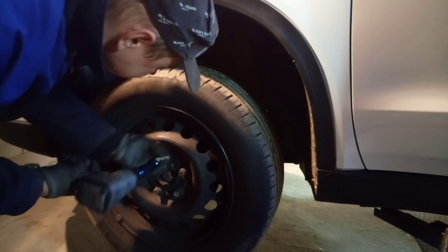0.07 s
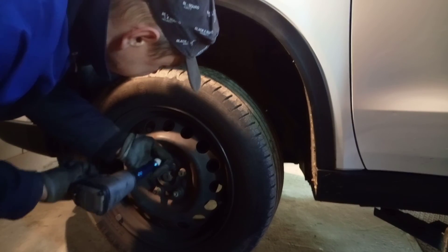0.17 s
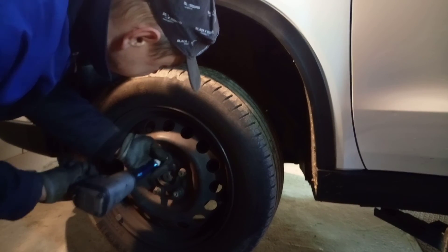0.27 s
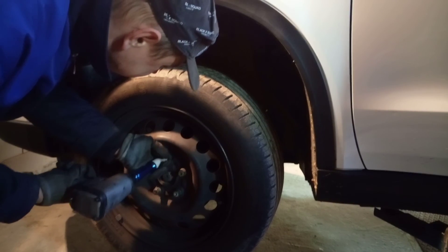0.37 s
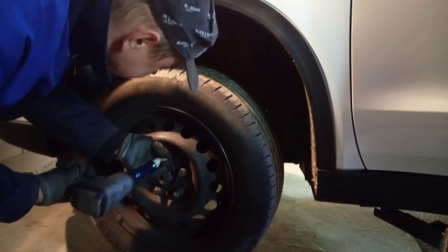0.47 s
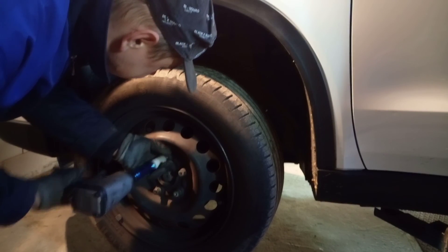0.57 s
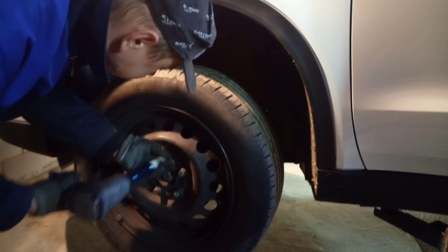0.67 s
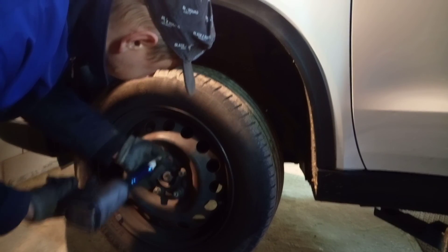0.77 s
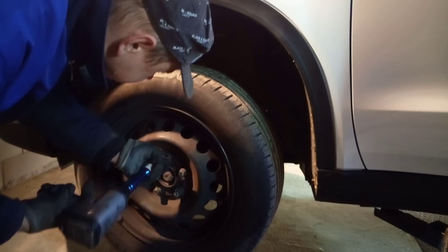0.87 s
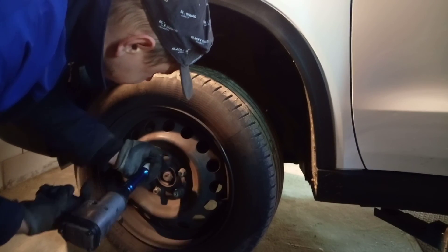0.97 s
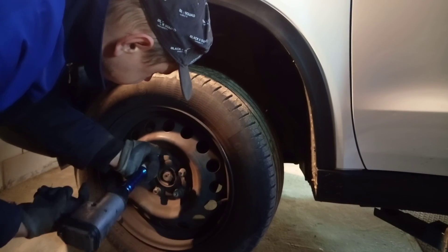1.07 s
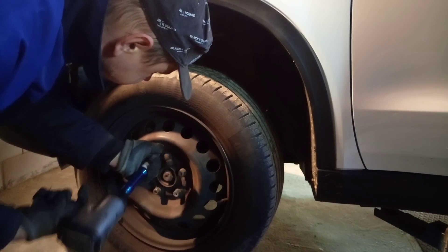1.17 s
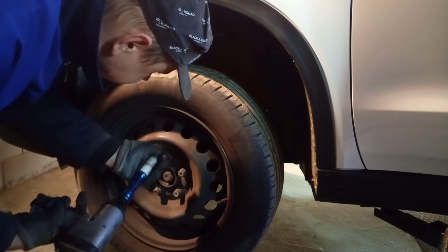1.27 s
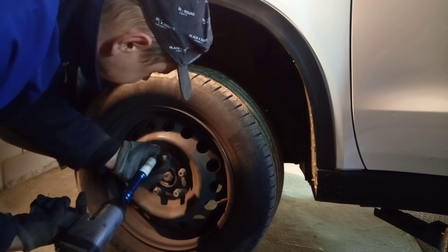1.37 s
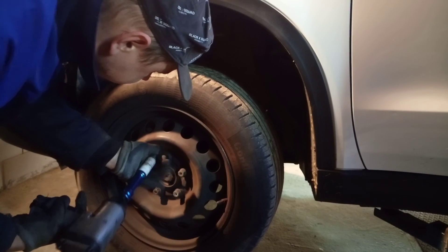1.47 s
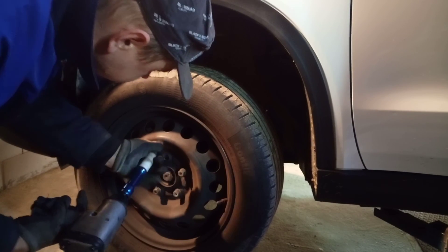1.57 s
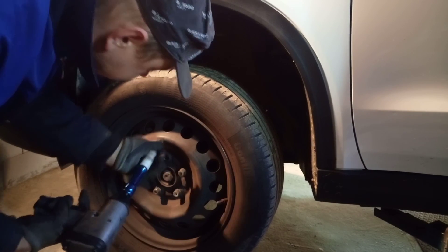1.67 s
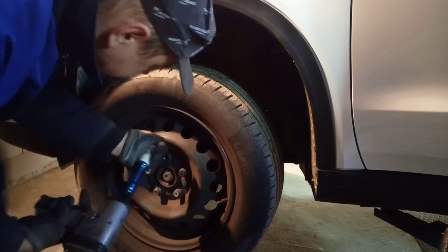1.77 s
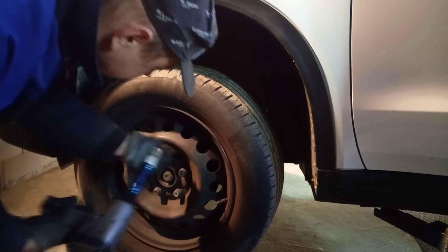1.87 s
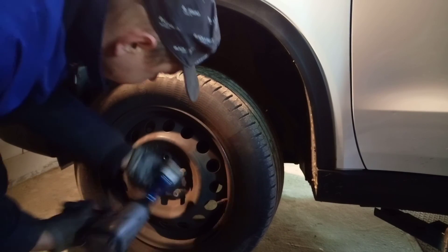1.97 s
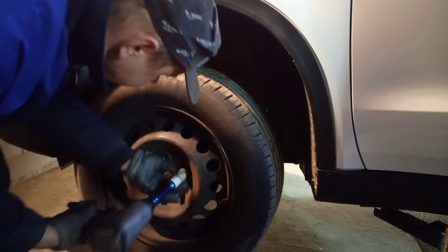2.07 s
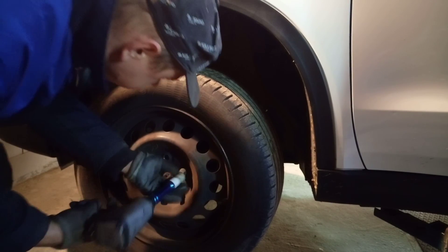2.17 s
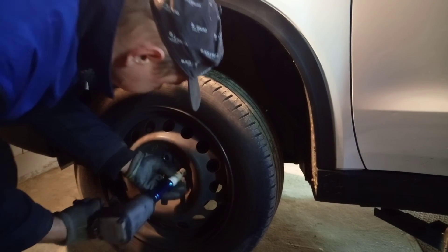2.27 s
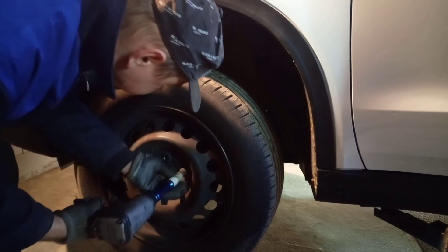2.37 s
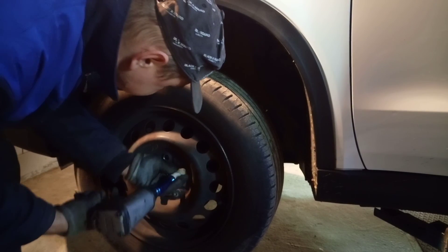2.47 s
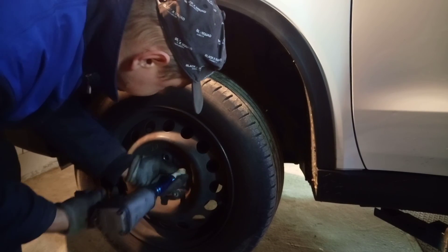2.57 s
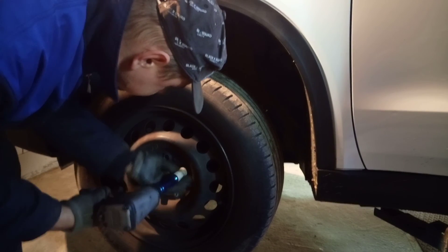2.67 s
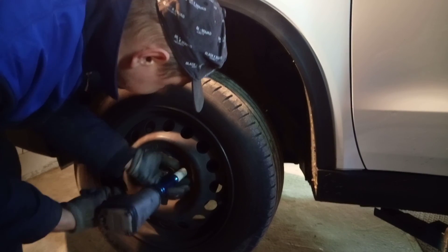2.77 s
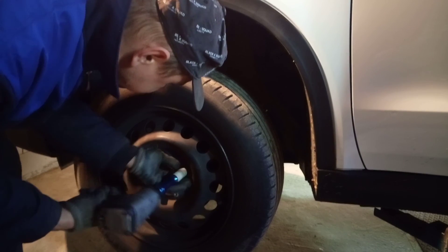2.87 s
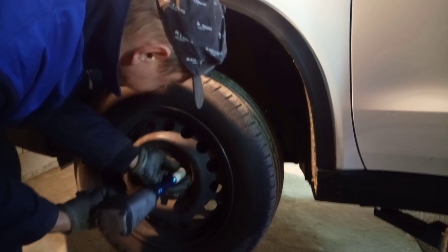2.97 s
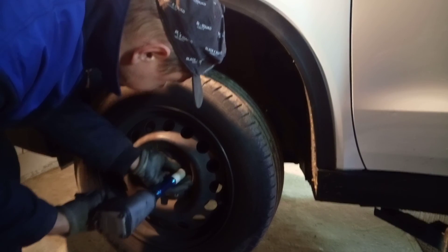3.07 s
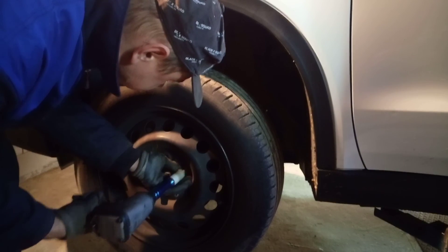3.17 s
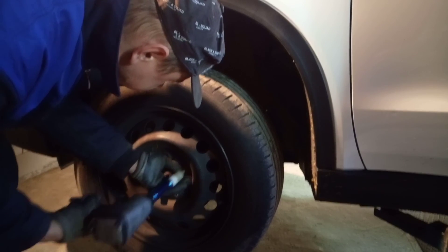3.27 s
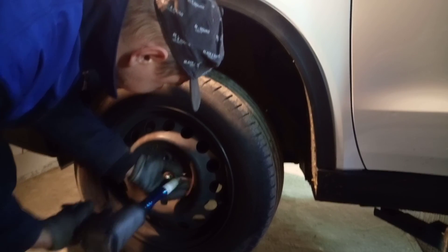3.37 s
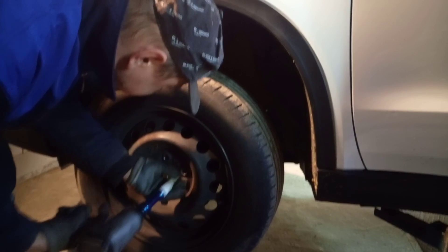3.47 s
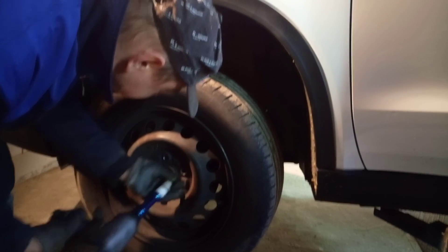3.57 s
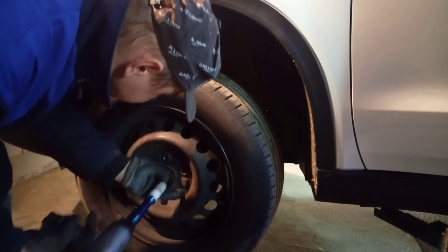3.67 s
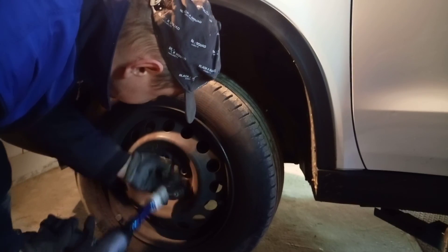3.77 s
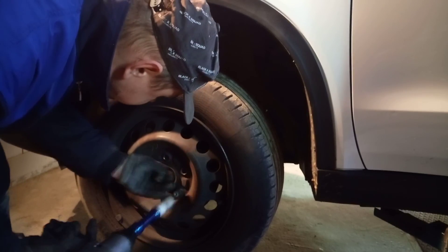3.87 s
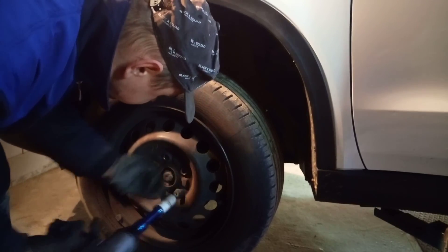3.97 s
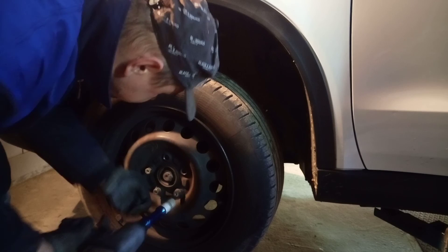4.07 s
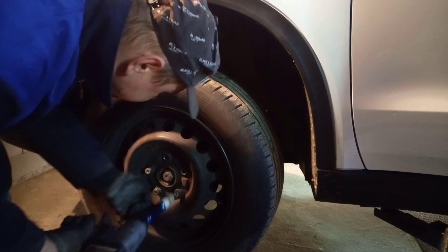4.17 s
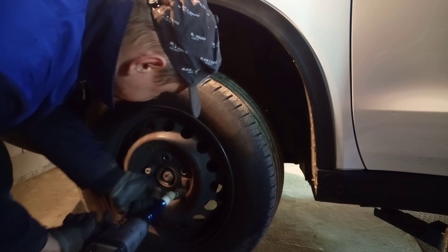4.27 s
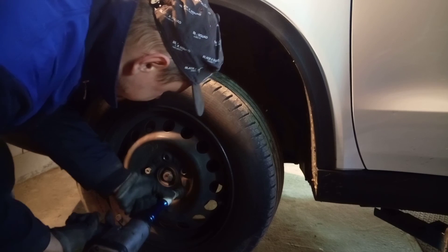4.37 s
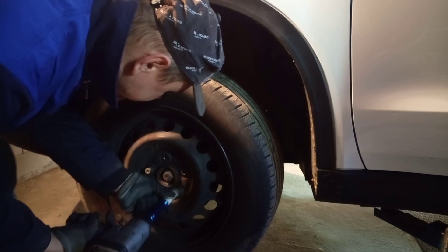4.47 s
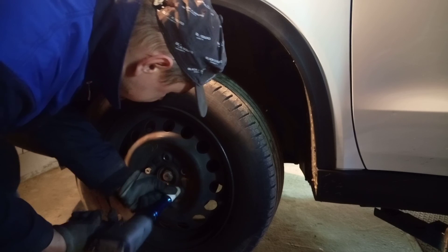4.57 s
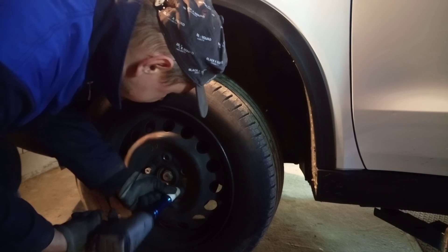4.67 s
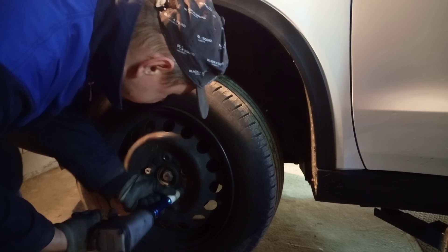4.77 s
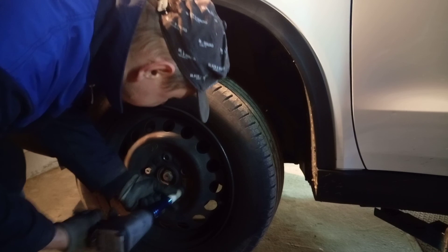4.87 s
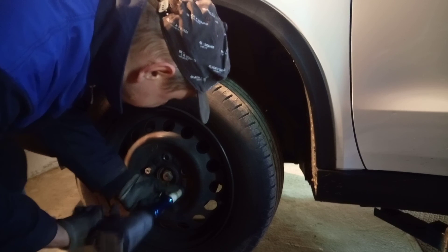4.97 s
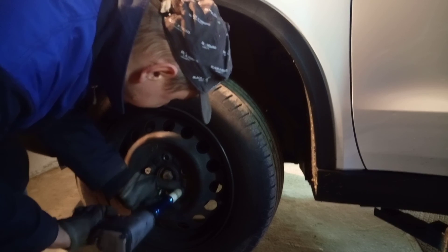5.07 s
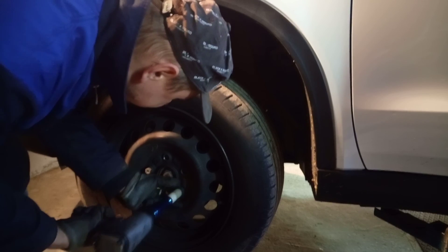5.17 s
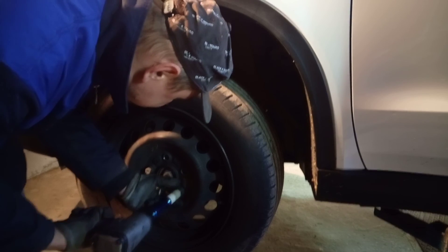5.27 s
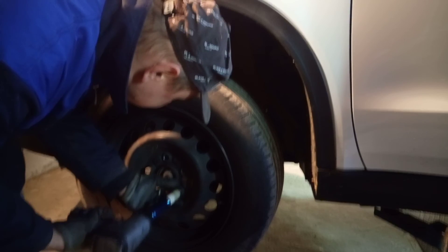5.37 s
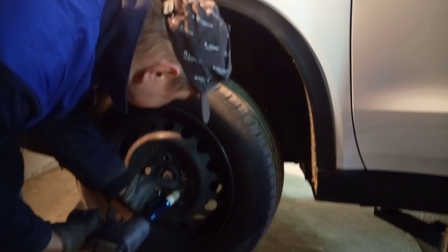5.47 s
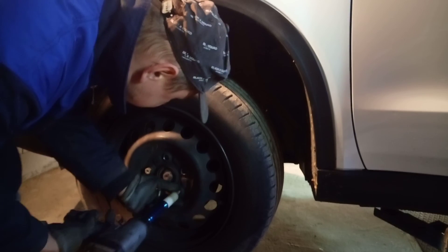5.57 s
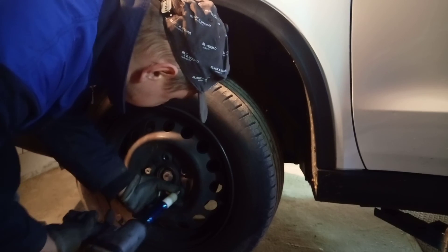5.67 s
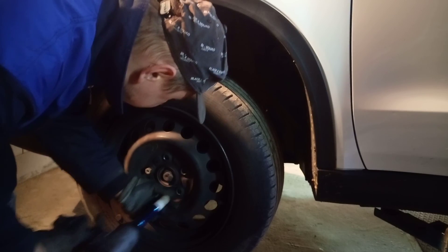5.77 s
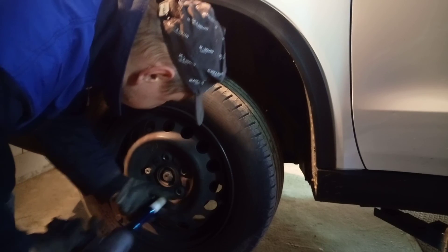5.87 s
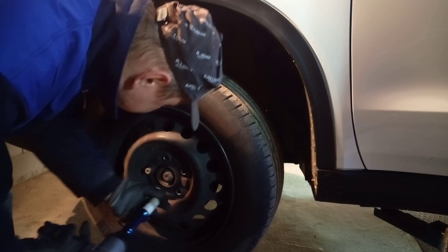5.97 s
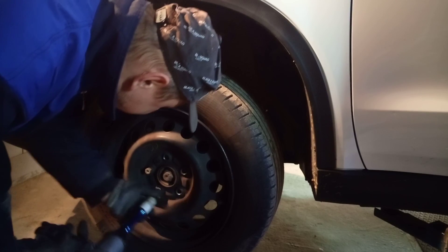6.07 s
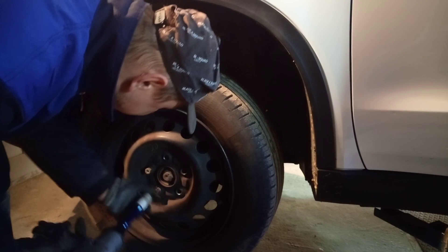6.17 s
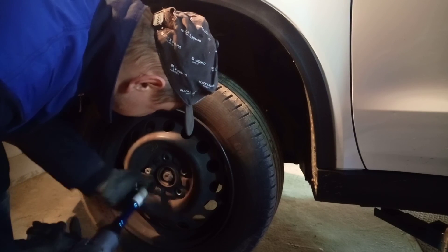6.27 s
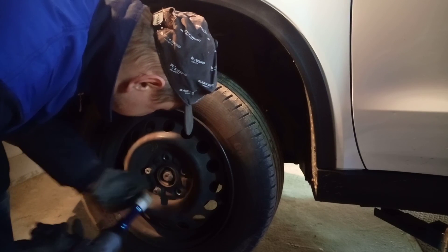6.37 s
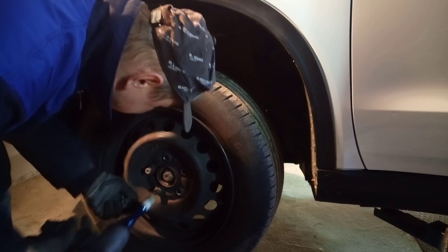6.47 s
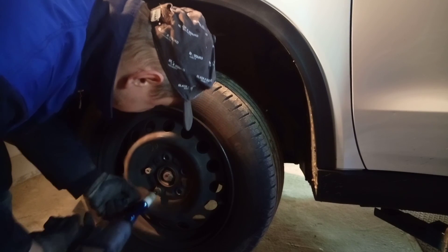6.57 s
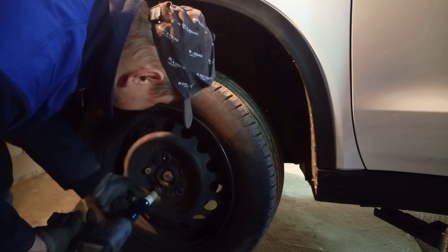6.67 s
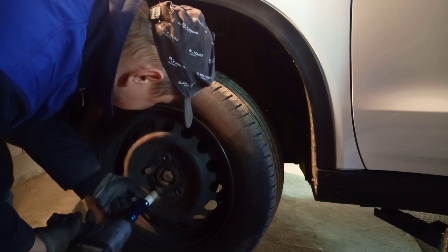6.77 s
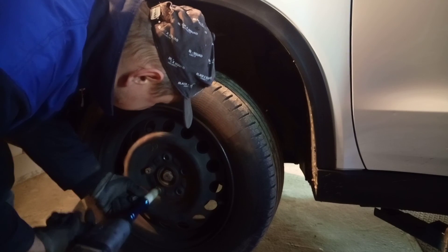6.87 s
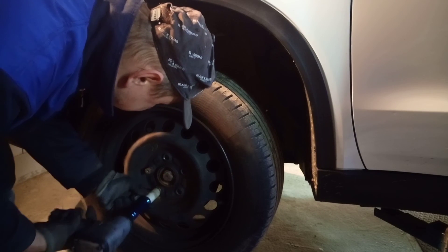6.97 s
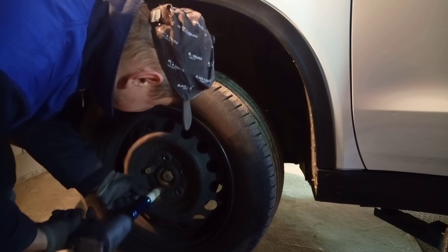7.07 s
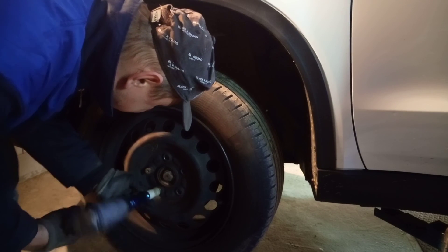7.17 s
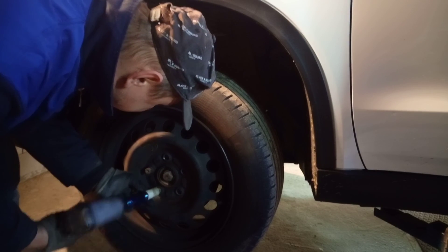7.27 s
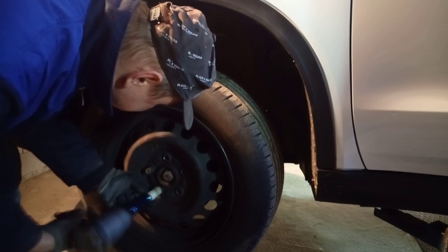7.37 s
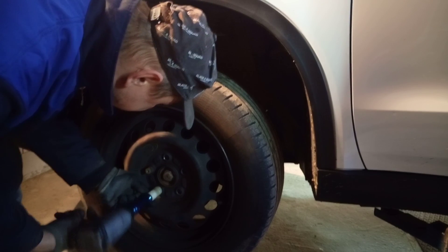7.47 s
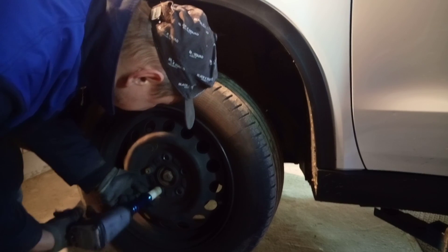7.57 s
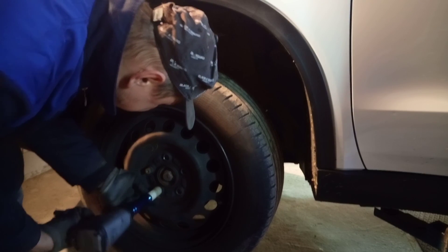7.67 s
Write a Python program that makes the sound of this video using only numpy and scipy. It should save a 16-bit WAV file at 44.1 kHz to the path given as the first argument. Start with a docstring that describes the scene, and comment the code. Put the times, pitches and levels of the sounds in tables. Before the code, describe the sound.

Four bursts of a cordless wrench on a steel wheel, heard from very near. Each whirrs upward with dense metallic rattle and sharp blows, then brakes in a falling groan. Between them come small nut clicks, cloth rubs, dull tyre thuds, hollow housing knocks and bright socket clanks that briefly ring the wheel. Short garage reflections follow, over a quiet unsteady hum and airy background.

```python
"""A cordless impact wrench spins lug nuts off a steel car wheel, close by in a garage.
The motor winds up and brakes as a stack of tones tied to shaft speed, with gear noise and socket rattle.
Hammer blows and socket clanks are bursts of steel chatter over decaying wheel modes.
Between the runs gloved hands click loose nuts and rustle, the socket scrapes once, the tool bumps the wheel.
A wavering low hum and a soft airy wash, both filtered noise, lie underneath."""
import sys
import numpy as np
from scipy import signal
from scipy.fft import rfft, irfft
from scipy.io import wavfile
from scipy.ndimage import uniform_filter1d

SR = 44100
rng = np.random.default_rng(int(sys.argv[2]) if len(sys.argv) > 2 else 0)


def file_out(sig):
    """Save sig as 16-bit WAV at sys.argv[1]."""
    # one column per channel
    cols = np.atleast_2d(sig).T
    # limit, then scale
    lim = np.clip(cols, -1, 1)
    pcm = np.round(lim * 32767).astype(np.int16)
    wavfile.write(sys.argv[1], SR, pcm)


N = 340893
TIME = np.arange(N) / SR
# Table levels are the mix before each function's own trims; spectrum levels are relative.


def amp(db):
    """Turns decibels into gain."""
    return 10 ** (np.asarray(db) / 20)


def unit(x):
    """Scales to rms 1."""
    return x / np.sqrt(np.mean(x ** 2) + 1e-20)


def read(points, hz):
    """Reads a spectrum on a log-frequency axis."""
    f, value = np.transpose(points)
    return np.interp(np.log(hz + 1), np.log(f + 1), value)


def add(mix, s, sound):
    """Mixes a sound in at time s; it may have begun before time zero."""
    start = round(s * SR)
    sound = sound[max(-start, 0):]
    part = mix[max(start, 0):][:len(sound)]
    part += sound[:len(part)]


def colour(x, spectrum, size=4096):
    """Filters causally to the given spectrum, falling 20 dB per octave past its ends."""
    hz = abs(np.fft.fftfreq(size, 1 / SR)) + 1
    octaves_out = abs(np.log2(hz / np.clip(hz, spectrum[0][0], spectrum[-1][0])))
    log_gain = np.log(amp(np.maximum(read(spectrum, hz) - 20 * octaves_out, -100)))
    # minimum phase: the energy comes as early as the spectrum allows
    response = np.fft.ifft(np.exp(np.conj(signal.hilbert(log_gain)))).real
    return signal.oaconvolve(x, response[:size // 2])[:len(x)]


def drift(length, hz):
    """Makes slow random movement around rms 1, with changes up to about the given rate."""
    f = np.fft.rfftfreq(length + SR, 1 / SR)
    noise = rfft(rng.standard_normal(length + SR))
    return unit(irfft(noise * np.exp(-(f / hz) ** 2)))[:length]


def grains(length, per_s, spread_db):
    """Scatters random contacts of uneven size and either sign."""
    size = amp(spread_db * np.minimum(rng.exponential(1, length), 4))
    sign = rng.choice([-1., 1.], length)
    return unit(size * sign * (rng.random(length) < per_s / SR))


def fade(length, size=300):
    """Ramps both ends briefly."""
    return signal.windows.tukey(length, 2 * size / length)


def resonate(x, hz, width):
    """Passes a sound through one damped resonance; width [Hz] sets the damping."""
    r = np.exp(-np.pi * width / SR)
    return signal.lfilter([1 - r, 0, r - 1], [1, -2 * r * np.cos(2 * np.pi * hz / SR), r * r], x)


def patchy(x, depth_db, size=1024):
    """Lets narrow parts of a noise swell and fade on their own."""
    z = signal.stft(x, nperseg=size)[2]
    patches = uniform_filter1d(rng.standard_normal(z.shape), size=4, axis=0)
    patches = unit(uniform_filter1d(patches, size=7, axis=1))
    return unit(signal.istft(z * amp(depth_db * patches), nperseg=size)[1][:len(x)])


# room bed over time: (time [s], low hum level [dB], airy wash level [dB])
BACKGROUND = [(1.15, -62.5, -65.5), (2.0, -59.5, -60.5), (3.6, -51, -57.5), (4.4, -50, -51),
              (5.901, -55.5, -55), (6.35, -56.5, -62), (7.15, -51.5, -53)]
# low hum spectrum: (frequency [Hz], level per Hz [dB])
HUM = [(20, -19), (45, -9.5), (65, 2), (90, -5.5), (115, 6), (150, -11), (220, -14.5), (400, -22),
       (900, -43.5)]
# airy wash spectrum: (frequency [Hz], level per Hz [dB])
WASH = [(150, -6.5), (380, -22.5), (560, 2.5), (760, -1.5), (920, 4), (1020, 9.5), (1140, 0.5),
        (1500, -4.5), (2500, -22.5), (4700, -5.5), (6500, -18), (8000, -36), (16000, -39.5)]


def background(hum_db=0, wash_db=-2.0, waver_db=2.3):
    """Filtered noise makes a wavering low hum and a soft wash of air with a faint whistle in it."""
    s, hum_level, wash_level = np.transpose(BACKGROUND)
    hum = unit(colour(rng.standard_normal(N), HUM))
    hum *= amp(hum_db + np.interp(TIME, s, hum_level) + waver_db * drift(N, 6))
    wash = patchy(colour(rng.standard_normal(N), WASH), depth_db=2.8)
    return hum + wash * amp(wash_db + np.interp(TIME, s, wash_level))


# how long the garage rings on: (frequency [Hz], decay by 60 dB [s])
GARAGE = [(100, 0.58), (400, 0.56), (1500, 0.49), (5000, 0.37), (8000, 0.13), (15000, 0.21)]


def garage(x, size=16):
    """Sparse reflections of random sign, each band dying at its own speed."""
    taps = np.zeros(SR)
    at = np.arange(SR // 200, SR - size, size)  # the reflections begin about 5 ms in
    taps[at + rng.integers(0, size, len(at))] = rng.choice([-1., 1.], len(at))
    hz, t, z = signal.stft(taps, SR, nperseg=256)
    decay = amp(-60 * t / read(GARAGE, hz)[:, None])
    tail = signal.istft(z * decay, SR, nperseg=256)[1]
    return signal.oaconvolve(x, tail / np.linalg.norm(tail))[:N]


# spectrum of the rustle and scrape: (frequency [Hz], level per Hz [dB])
CLOTH = [(150, -27), (400, 1), (1000, -2), (2500, 1.5), (3600, 1), (4700, 4), (6000, 2), (7300, -22),
         (10000, -30), (13800, -29), (15200, -8), (16200, -29)]
# gloves and sleeves rubbing; the short last row is the socket scraping before it lands:
# (start [s], length [s], level [dB])
RUBS = [(1.024, 0.25, -62), (1.281, 0.16, -53), (1.42, 0.32, -52.5), (1.628, .22, -52.5),
        (1.82, 0.26, -57.5), (2.212, 0.16, -59), (3.42, 0.3, -49.5), (3.9, 0.22, -56), (4.27, 0.22, -52),
        (5.619, 0.25, -48.5), (5.798, 1, -57.5), (6.86, 0.28, -59.5), (7.177, 0.062, -48)]
# faint rubbing squeaks: (start [s], length [s], middle pitch [Hz], level [dB])
SQUEAKS = [(1.325, .125, 700, -48), (1.44, .06, 715, -57), (1.53, .07, 760, -60)]


def handling(level_db=-1, rough_db=4, glide=0.048):
    """Grainy noise in short swells for cloth rubs and one socket scrape; squeaks are tones gliding up."""
    out = np.zeros(N)
    grip = amp(4.5 * np.tanh(drift(N, 30)))
    rustle = patchy(colour(grains(N, 1500, 4.0) * grip, CLOTH), depth_db=2.5, size=512)
    for s, length_s, db in RUBS:
        add(out, s, amp(db + level_db) * signal.windows.tukey(round(length_s * SR), .6))
    out *= rustle
    for s, length_s, hz, db in SQUEAKS:
        u = np.linspace(0, 1, round(length_s * SR))
        turns = np.cumsum(hz * (1 + glide * (u - .5) + 0.064 * drift(len(u), 120))) / SR
        level = amp(db + rough_db * drift(len(u), 85)) * np.sin(np.pi * u ** 1.7)
        add(out, s, level * np.sin(2 * np.pi * turns))
    return out


# the tool bumping wheel and tyre: (time [s], tyre thud level [dB], housing knock level [dB])
BUMPS = [(1.667, -54, -40.5), (2.072, -42.5, -37.5), (2.295, -46.5, -33.5), (4.107, -43, -37.5),
         (4.569, -52, -35), (4.752, -33.5, -26.5), (6.511, -44.5, -41.5), (6.767, -52, -36.5),
         (7.245, -39, -26.5)]


def bumps(tyre_db=2, housing_db=0, tyre_s=0.091, housing_s=.035, size=14000):
    """The tool bumps the wheel: a low thud from the tyre and a hollow knock from the housing."""
    out, t = np.zeros(N), TIME[:size]
    # both spectra: (frequency [Hz], level per Hz [dB])
    thud = [(45, -7.0), (80, 2), (125, 3.0), (190, -3.5), (300, -28.5)]
    knock = [(180, -13.5), (300, -11.5), (380, -12), (470, -10.5), (620, -18.5), (900, -18.5)]
    for s, tyre, housing in BUMPS:
        parts = (tyre + tyre_db, thud, tyre_s), (housing + housing_db, knock, housing_s)
        for db, spectrum, decay_s in parts:
            noise = unit(colour(rng.standard_normal(size), spectrum))
            envelope = (1 - np.exp(-t / 0.0043)) * np.exp(-t / decay_s)
            add(out, s, amp(db) * noise * envelope)
    return out


LEAD_S = .001  # each contact begins this long before its listed time
# the three registers of a steel contact, each: (frequency [Hz], level per Hz [dB])
BRIGHT = [(1500, -32), (2400, 0), (3300, -0.5), (4600, 1), (5600, 0.5), (6500, -1.5), (7300, -12.5),
          (9000, -39)]
BODY = [(120, -44.5), (330, -3), (480, -2), (700, -3.5), (1050, 1), (1400, 1), (1900, 5.5), (2400, -1),
        (3400, -27)]
SIZZLE = [(6000, -20), (7800, 4), (9500, 1.5), (11700, -3.5), (13600, -4), (14700, 4), (15500, 6.5),
          (16200, -17)]


def contact(hz, levels_db, decay_s, tail_db, tail_s, focus=2.0, crack=2.0, size=6000):
    """Steel on steel: one crack in chatter that dies fast over a fainter, longer tail, strongest near hz."""
    t = TIME[:size]
    onset = 1 - np.exp(-t / .001)
    envelope = onset * (np.exp(-t / decay_s) + amp(tail_db) * np.exp(-t / tail_s))
    first = crack * signal.unit_impulse(size, SR // 700)
    bands = []
    for spectrum in (BRIGHT, BODY, SIZZLE):
        chattering = envelope * grains(size, 9000, spread_db=2.2)
        bands.append(colour(first + chattering, spectrum))
    bands[0] = bands[0] + focus * resonate(bands[0], hz, 560)
    # levels refer to the first 20 ms
    return sum(amp(db) * band / np.std(band[:SR // 50]) for db, band in zip(levels_db, bands))


# loose nuts clicking in hand and socket:
# (time [s], strength [dB], brightest frequency [Hz], sizzle relative to strength [dB])
CLICKS = [(0.998, -37.5, 4500, -24.5), (1.016, -35.5, 3370, -32), (1.038, -36.5, 4800, -21),
          (1.122, -40.5, 3400, -34), (1.5334, -34.5, 3870, -21), (1.635, -28.5, 3480, -12.5),
          (1.83, -35, 3170, -13), (1.8914, -44, 4140, -27), (2.4137, -32.5, 5100, -26),
          (3.43, -36, 3914, -22), (3.455, -31, 4240, -15), (3.47, -29, 4650, -20),
          (3.6057, -31.5, 4870, -12), (3.9955, -25, 5550, -18.5), (4.1024, -28, 4600, -12),
          (4.1136, -32.5, 5200, -11), (4.3446, -41.5, 5200, -18), (4.3962, -36.5, 4960, -42),
          (5.7018, -26.5, 4480, -20.5), (6.142, -33.5, 4830, -17.5), (6.316, -36.5, 4760, -39),
          (6.427, -36, 2800, -35), (6.4989, -26, 2700, -16), (6.5113, -26, 4850, -11.5)]


def clicks(bright_db=-7, body_db=-17, sizzle_db=-7.5):
    """Loose nuts click, damped by the glove, so no wheel ring follows."""
    out = np.zeros(N)
    for s, db, hz, sizzle in CLICKS:
        levels = db + bright_db, db + body_db, db + sizzle + sizzle_db
        sound = contact(hz, levels, decay_s=0.007, tail_db=-25, tail_s=.024, focus=1.1)
        add(out, s - LEAD_S, sound)
    return out


LOWER_NUTS_FROM_S = 4.0
# ringing modes of socket on wheel:
# (frequency [Hz], decay by 60 dB [s], level on an upper nut [dB], level on a lower nut [dB])
STEEL = [(474, .35, -13, -14), (1003, .36, -13, -11), (1055, .35, -6, -17), (1450, .25, -12, -10),
         (1622, .3, -12, -12), (1750, .32, -11, -11), (1843, .36, 0, -8), (1911, .32, -7, -4),
         (2170, .25, -10, -9), (2743, .36, -14, -1), (2765, .22, -16, -11), (3095, .38, -14, -4),
         (3521, .35, -9, -13), (4290, .27, -10, -18), (4466, .3, -13, -17), (4692, .3, -9, -15),
         (5136, .26, 0, -8), (5205, .3, -4, 0), (5274, .3, -3, 2), (5335, .25, -4, 1), (5440, .18, -4, -4),
         (5800, .2, -6, -5), (6280, .22, -11, -13)]


def ring(s, strongest_hz, favour_db=6.0, uneven_db=-1.0):
    """One blow's ring: the mode balance depends on the nut and on just where the socket lands."""
    t = TIME[:SR // 2]
    hz, t60, upper_db, lower_db = np.transpose(STEEL)[:, :, None]
    luck, bend, phase = rng.standard_normal((3, len(STEEL), 1))
    favoured = np.exp(-(np.log(hz / strongest_hz) / .05) ** 2)
    nut_db = lower_db if s >= LOWER_NUTS_FROM_S else upper_db
    db = nut_db + favour_db * favoured + uneven_db * luck
    tones = np.sin(2 * np.pi * (hz * (1 + .001 * bend) * t + phase))
    modes = amp(db - 60 * t / t60) * tones
    return modes.sum(0) * (1 - np.exp(-t / .002)) / 2


# socket meeting nut and wheel: (time [s], strength [dB], brightest frequency [Hz], body [dB],
# sizzle [dB], ring [dB], strongest ring [Hz]); body, sizzle and ring are relative to strength
CLANKS = [(2.0716, -23, 2620, -2.5, -19, -45, 1843), (2.0784, -22, 5160, -14, -9, -47, 1843),
          (2.29, -17.5, 4670, -12, -13.5, -24, 5136), (2.304, -15, 5130, -5, -22, -14.5, 1055),
          (2.4466, -24, 4840, -5, -13, -32, 5136), (2.4538, -18, 4700, -15, -12, -17, 5136),
          (2.4727, -17, 5400, -1.5, -31, -12, 1911), (4.4735, -49, 2870, 19.5, -39, -2, 1622),
          (4.577, -14.5, 5500, -3, -26, -13.5, 1911), (4.6454, -23, 5660, 3, -30, -22, 1622),
          (4.704, -27.5, 4500, -5.5, -26, -33, 4692), (4.749, -12, 5380, -7, -18, -12.5, 2743),
          (6.76, -25, 4970, 2.5, -29, -14.5, 1770), (6.778, -24.5, 5150, 0.5, -34, -23, 3095),
          (6.851, -38, 5300, -2, -45, -21, 5274), (6.976, -50, 2880, 18, -26, -2, 1622),
          (7.0368, -37, 4740, -7, -39, -18, 4692), (7.2001, -19, 4900, -3.5, -30, -36, 1750),
          (7.2423, -11, 5400, -8, -20, -16, 3095)]


def clanks(bright_db=-8.5, body_db=-7.5, sizzle_db=-8.0, ring_db=3.0):
    """The socket lands on a nut and sets the wheel ringing."""
    out = np.zeros(N)
    for s, db, hz, body, sizzle, ringing, ring_hz in CLANKS:
        levels = db + bright_db, db + body + body_db, db + sizzle + sizzle_db
        add(out, s - LEAD_S, contact(hz, levels, decay_s=.0077, tail_db=-13.5, tail_s=0.023))
        add(out, s, amp(db + ringing + ring_db) * ring(s, ring_hz))
    return out


# hammer blows and the hardest knocks of the spinning socket:
# (time [s], strength [dB], brightest frequency [Hz], body relative to strength [dB])
BLOWS = [(0.0113, -10, 4100, -5.5), (0.0799, -12, 4480, -14.5), (.242, -14.5, 6660, -17),
         (0.3287, -14.5, 4700, -21), (.349, -17.5, 4580, -28), (0.4979, -18, 4600, -25),
         (0.584, -19, 5060, -17), (.63, -21, 6100, -11.5), (0.705, -33, 3680, -5), (2.611, -17.5, 4890, 0),
         (2.6216, -15, 5310, -13.5), (2.639, -15, 5450, -14.5), (2.6738, -9, 2770, -5.5),
         (2.7235, -11.5, 3990, -1.5), (2.8629, -13.5, 4550, -8), (3.1427, -16.5, 5070, -8),
         (3.272, -17, 4570, -22.5), (3.3376, -22.5, 5080, -12.5), (4.9117, -13, 5270, -11.5),
         (4.9314, -11.5, 5700, -11), (4.9656, -9.5, 2740, -12), (5.0511, -10.5, 4400, -11),
         (5.1703, -13, 4770, -10.5), (5.434, -16, 5200, -22), (5.55, -18, 4800, -12),
         (5.6167, -29, 3045, -3), (7.4467, -14, 4735, -11), (7.4537, -14.5, 4750, -25),
         (7.4706, -15, 5340, -9), (7.506, -9, 5500, -7), (7.663, -12.5, 5440, -11.5)]
# top treble of a blow; below the first row's strength it stays faint, above it harder blows
# sizzle more: (strength [dB], sizzle level [dB])
BLOW_SIZZLE = [(-19, -60), (-26.5, -44), (-18, -34), (-5, -17)]


def blows(bright_db=-9.0, body_db=-9, sizzle_db=-9.0, ring_db=-20):
    """Short hard blows through the seated socket; the wheel rings only a little."""
    out = np.zeros(N)
    for s, db, hz, body in BLOWS:
        sizzle = np.interp(db, *np.transpose(BLOW_SIZZLE))
        levels = db + bright_db, db + body + body_db, sizzle + sizzle_db
        add(out, s - LEAD_S, contact(hz, levels, decay_s=.0048, tail_db=-18.5, tail_s=.018))
        add(out, s, amp(db + ring_db) * ring(s, hz))
    return out


# bare steel ticks of the rattle: (frequency [Hz], level per Hz [dB])
RATTLE = [(1060, -32), (1800, -14.5), (2300, -18.5), (2840, -0.5), (3170, -2), (3610, 3.5), (3840, -1),
          (4620, 0.5), (5800, -0.5), (6470, 2.5), (7990, -14), (9770, -18), (13400, -22.5), (14900, -14),
          (16000, -15)]
# short-lived resonances of spinning socket and anvil: (frequency [Hz], width [Hz], level [dB])
SOCKET = [(1825, 180, -12.5), (2090, 45, -7), (2740, 21, -19.5), (2920, 38, 0), (3400, 110, -8.5),
          (3800, 37, -8), (4190, 180, 0.5), (4640, 80, -1.5), (4600, 130, 2.5), (5090, 160, 0.5),
          (5530, 39, 0.5), (5910, 200, -1.5), (6260, 120, -1.5), (6510, 80, -4), (11650, 150, -14),
          (15000, 500, -3)]


def chatter(angle, throb=0.073, tick_db=-2, socket_db=-3, knocks_per_s=450, patchy_db=6.0):
    """Socket and nut collide, a little more at one point of each turn; the resonances waver separately."""
    length = len(angle)
    bunching = unit(np.exp(throb * np.cos(angle)))
    ticks = grains(length, 3000, 0.82) * bunching * amp(0.5 * drift(length, 90))
    ticks = patchy(colour(ticks, RATTLE), depth_db=3.5, size=512)
    knocks = np.zeros(length)
    for hz, width, db in SOCKET:
        hits = grains(length, knocks_per_s, 2.1) * bunching
        ringing = resonate(resonate(hits, hz, width), hz, 8 * width)
        knocks += amp(db + patchy_db * drift(length, 45)) * unit(ringing)
    return amp(tick_db) * ticks + amp(socket_db) * unit(knocks)


# shaft turns per second as the motor catches and running free; STOP_HZ sets how long braking lasts
START_HZ, TOP_HZ, STOP_HZ = 87.7, 365.5, 35.88
# motor orders: (multiple of shaft speed, level under power [dB], level while braking [dB])
ORDERS = [(1, 2.5, 7.5), (2, -3.5, 0), (3, -9.5, -5.5), (4, -15, -9.5), (5, -12.5, -19), (6, -13.5, -15.5),
          (8, -31.5, -19), (9, -9.5, -15.5)]
# how the housing radiates the orders: (frequency [Hz], gain [dB])
HOUSING = [(70, -15), (115, -6.5), (180, -3.5), (240, -11), (350, 3.5), (480, -6.5), (690, 2.5), (840, -5),
           (1020, 10), (1250, 6), (2000, 4), (3200, -10.5)]
# gear case noise: (frequency [Hz], level per Hz [dB])
GEARS = [(200, -38.5), (400, -4.5), (550, -6.5), (800, -2), (1020, -5), (1200, -3.5), (1600, -3.5),
         (2000, -1), (2600, 2), (3600, -39)]
# housing shudder as the motor labours and brakes: (frequency [Hz], level per Hz [dB])
SHUDDER = [(60, -40), (120, -13.5), (190, -7.5), (280, -10.5), (360, 2), (450, -8.5), (600, -16.5),
           (1000, -27.5)]


def wrench(hz, coast, rattle_level, motor_level, gear_level,
           rattle_db=5, motor_db=-4, gears_db=-4.0, shudder_db=-7,
           wobble=0.01294, flutter_db=3.0, surge_db=1.0, judder=2.2, blur_db=2.0):
    """Motor orders, gears and rattle follow the shaft speed hz; coast is the braking clock [s]."""
    length = len(hz)
    braking = np.clip(coast / 0.04, 0, 1)
    unsteady = wobble * (1 + judder * braking) * drift(length, 90)
    angle = 2 * np.pi * np.cumsum(hz * (1 + unsteady)) / SR
    gains, orders = [], []
    for k, on, off in ORDERS:
        gains.append(amp(on + (off - on) * braking + read(HOUSING, k * hz)))
        flutter = amp(flutter_db * drift(length, 72))
        orders.append(flutter * np.cos(k * angle + 2 * np.pi * rng.random()))
    gains = np.array(gains)
    # scaling by the summed gains keeps the stack's overall level even
    tone = np.sqrt(2) * (gains * np.array(orders)).sum(0) / np.linalg.norm(gains, axis=0)
    meshing = grains(length, 2500, 1.5) * np.exp(0.23 * np.cos(angle))
    gears = patchy(colour(meshing, GEARS), depth_db=3.0)
    # near top speed under power the clean orders take over from gear noise and shudder
    free = (hz / TOP_HZ) ** 4 * (1 - braking)
    shudder = unit(colour(grains(length, 900, 3.2), SHUDDER)) * amp(shudder_db - 26 * free)
    motor = motor_level * (amp(motor_db - blur_db * braking) * tone + shudder)
    low = motor + gear_level * amp(gears_db - 5 * free) * gears
    high = rattle_level * amp(rattle_db + surge_db * drift(length, 25)) * chatter(angle)
    return low * fade(length), high * fade(length)


# light touches of the trigger that seat the socket:
# (start [s], length [s], motor level [dB], rattle level [dB])
NUDGES = [(2.461, 0.086, -30, -41), (4.763, 0.17, -31, -39.5), (7.256, .18, -30, -38)]
KICK_HZ, KICK_S, CRAWL_HZ = 191.4, .028, 105.2  # the motor kicks, then settles to a crawl
NUDGE_FADE_DB_PER_S, SEATING_DB_PER_S = 32.5, 49  # rattle fades faster as the socket seats
NUDGE_GEARS_DB = 9  # gears above rattle, before the trims in wrench()


def nudge(length_s, motor_db, rattle_db):
    """The motor kicks and crawls, turning the socket over the nut while motor and rattle fade."""
    t = np.arange(0, length_s, 1 / SR)
    hz = CRAWL_HZ + (KICK_HZ - CRAWL_HZ) * np.exp(-t / KICK_S)
    motor = amp(motor_db - NUDGE_FADE_DB_PER_S * t)
    rattle = amp(rattle_db - SEATING_DB_PER_S * t)
    return wrench(hz, t, rattle, motor, rattle * amp(NUDGE_GEARS_DB))


# full trigger pulls, one per nut: (start [s], held [s], wind-up [s], braking [s],
# rattling on after release [s], rattle level [dB], motor level [dB], gear level [dB])
PULLS = [(-.025, 0.39, 0.21, 0.2, .2, -27, -23, -30.5), (2.6, 0.41, 0.24, .2, .24, -28.5, -23, -28.5),
         (4.905, .325, .22, .225, 0.26, -29, -22.5, -31), (7.44, .4, 0.24, 0.22, .22, -28.5, -24.5, -29.5)]
MOTOR_SWELL_DB = 12  # motor growth from rest to top speed
BRAKE_GROAN_S = 0.17  # the braking motor holds its level this long
RATTLE_RISE_S, RATTLE_SAG_DB_PER_S = 0.021, 27.5
RATTLE_DIES_DB_PER_S, MOTOR_DIES_DB_PER_S, GEARS_DIE_DB_PER_S = 124, 129, 146


def pull(held_s, wind_up_s, brake_s, rattle_on_s, rattle_db, motor_db, gears_db):
    """The motor winds up while the trigger is held, then brakes; the noise carries on briefly and dies."""
    t = np.arange(0, held_s + brake_s * np.log(TOP_HZ / STOP_HZ), 1 / SR)
    coast = np.maximum(t - held_s, 0)
    dying = np.maximum(coast - rattle_on_s, 0)
    motor_dying = np.maximum(coast - BRAKE_GROAN_S, 0)
    # t - coast stops at release, so this holds the speed reached under power
    driven_hz = START_HZ + (TOP_HZ - START_HZ) * np.tanh((t - coast) / wind_up_s)
    slow = 1 - (driven_hz / TOP_HZ) ** 2
    rattle = amp(rattle_db - RATTLE_SAG_DB_PER_S * coast - RATTLE_DIES_DB_PER_S * dying)
    motor = amp(motor_db - MOTOR_SWELL_DB * slow - MOTOR_DIES_DB_PER_S * motor_dying)
    gears = amp(gears_db - GEARS_DIE_DB_PER_S * dying)
    take_up = 1 - np.exp(-t / RATTLE_RISE_S)
    hz = driven_hz * np.exp(-coast / brake_s)
    return wrench(hz, coast, rattle * take_up, motor, gears * take_up)


def scene():
    """Mixes the wrench, contacts and hands over the room bed, with garage reflections."""
    motor, rattle = np.zeros(N), np.zeros(N)
    for action, rows in (pull, PULLS), (nudge, NUDGES):
        for s, *row in rows:
            low, high = action(*row)
            add(motor, s, low)
            add(rattle, s, high)
    near = rattle + clanks() + blows() + clicks() + bumps()
    reflections = garage(amp(-9.5) * near + amp(-8.5) * motor)
    return (near + motor + reflections + handling() + background())[None]


EDGE_HZ = 15750


def record(dry):
    """Cuts the treble steeply above the band edge with a linear-phase low-pass."""
    low_pass = signal.firwin(401, EDGE_HZ, window=("kaiser", 8), fs=SR)
    return signal.oaconvolve(dry, low_pass[None], "same")


dry = scene()
out = record(dry)
file_out(out)
```